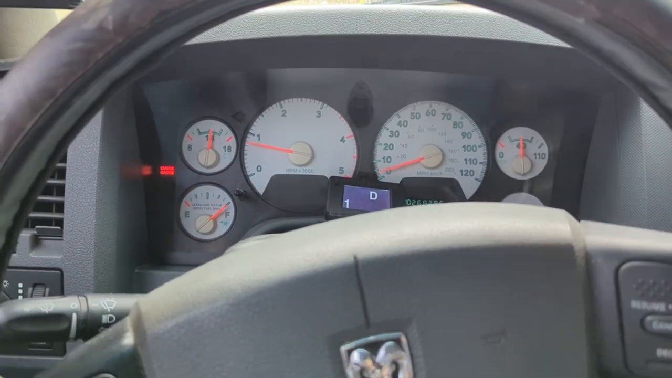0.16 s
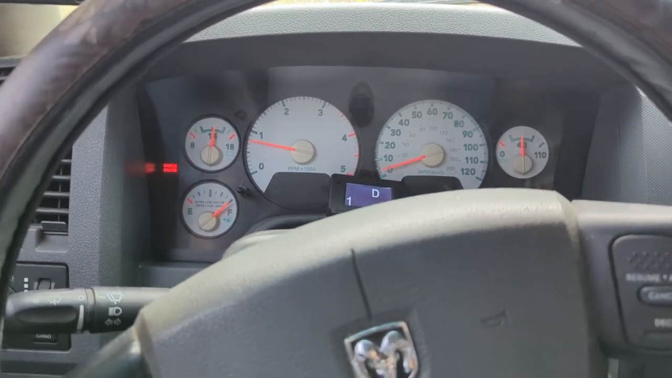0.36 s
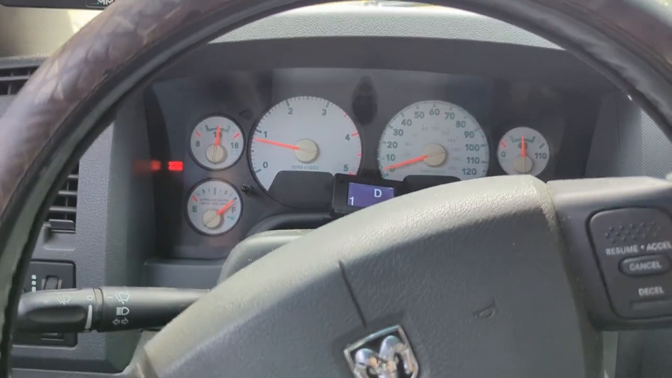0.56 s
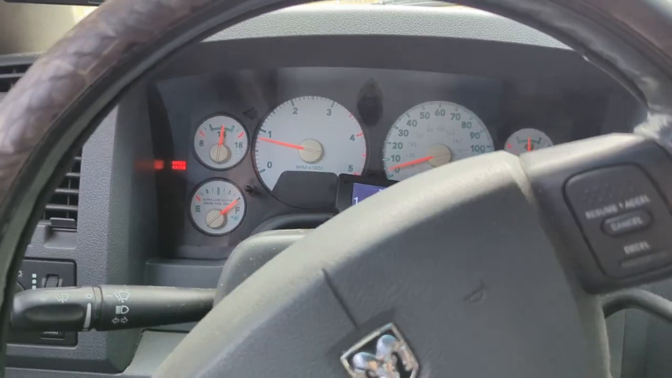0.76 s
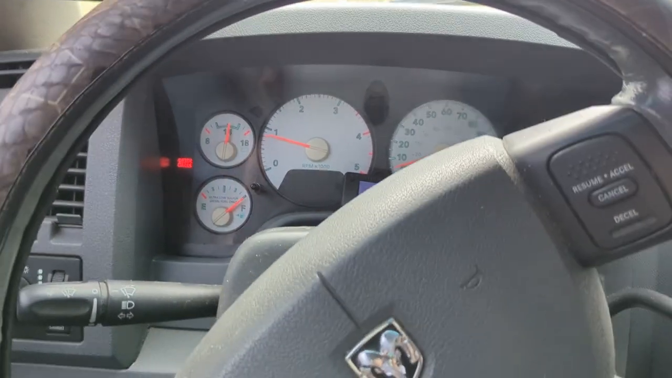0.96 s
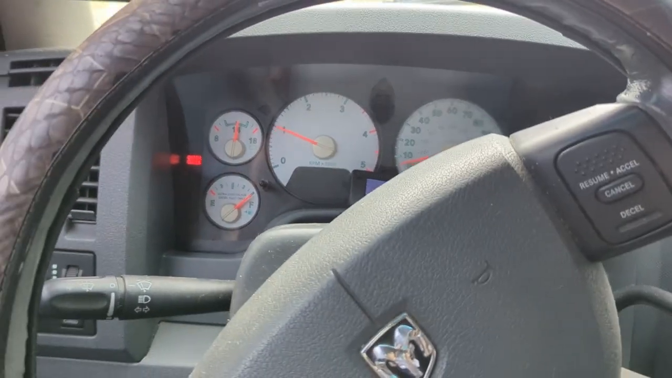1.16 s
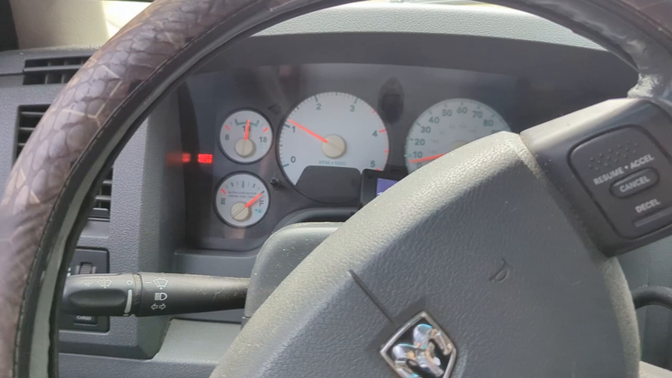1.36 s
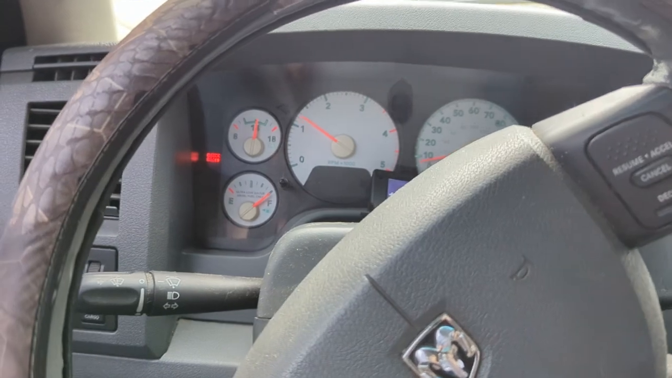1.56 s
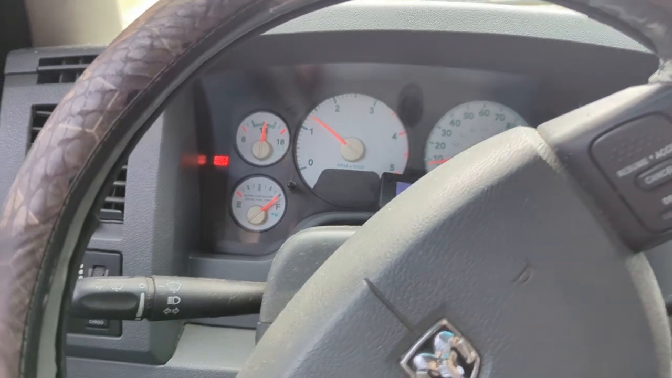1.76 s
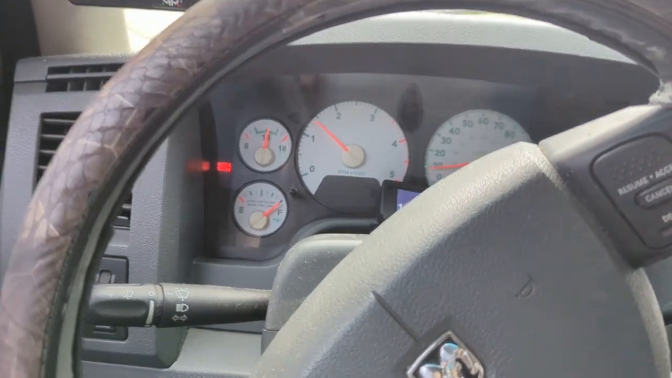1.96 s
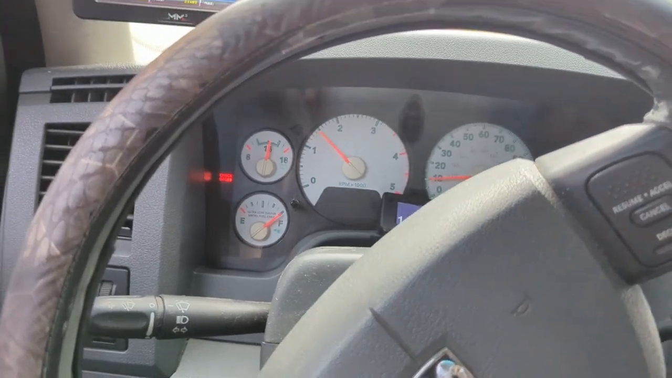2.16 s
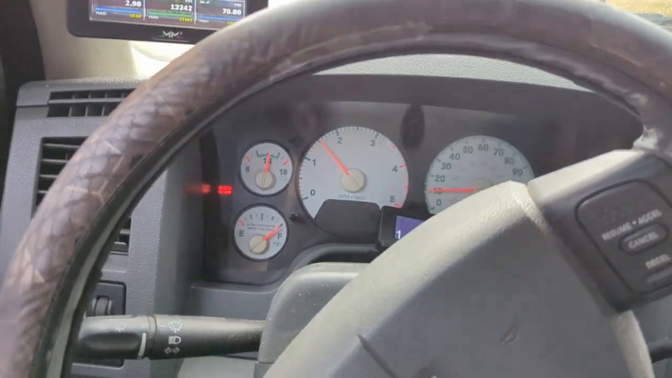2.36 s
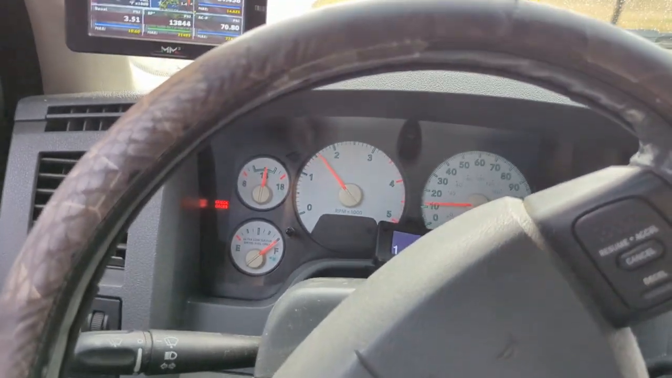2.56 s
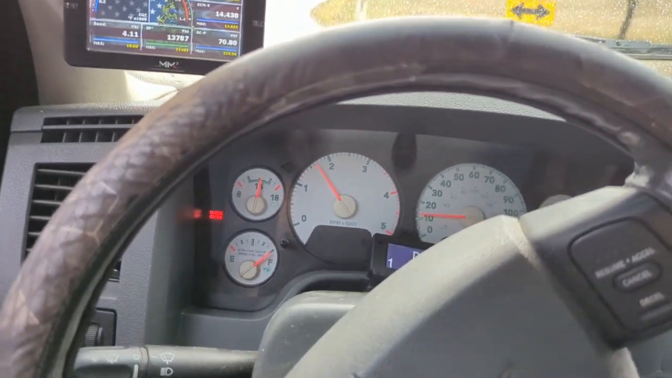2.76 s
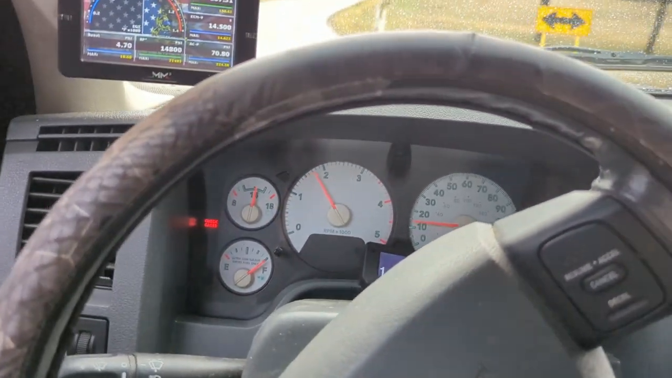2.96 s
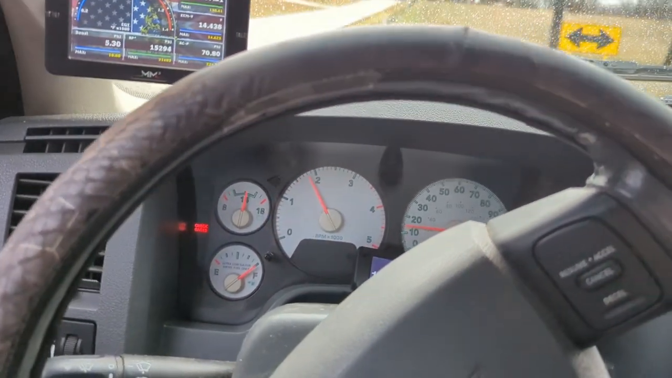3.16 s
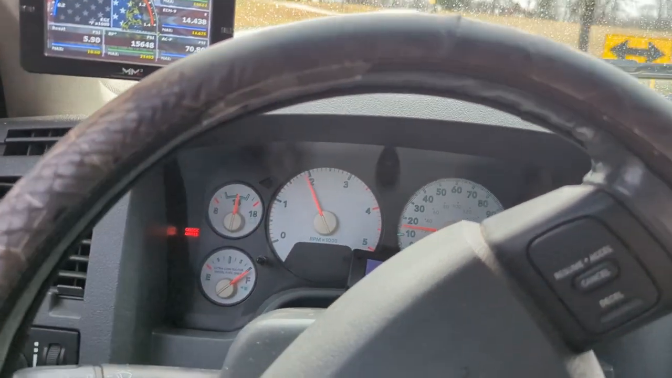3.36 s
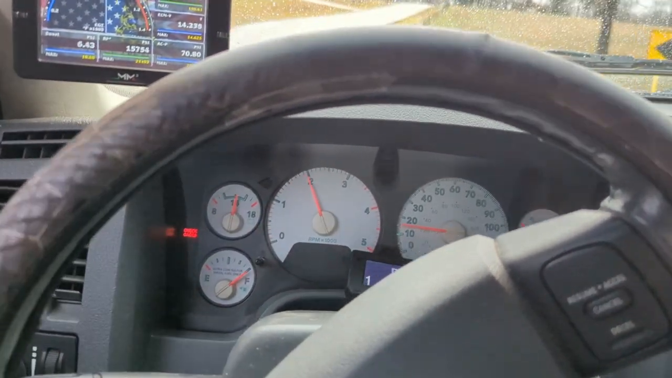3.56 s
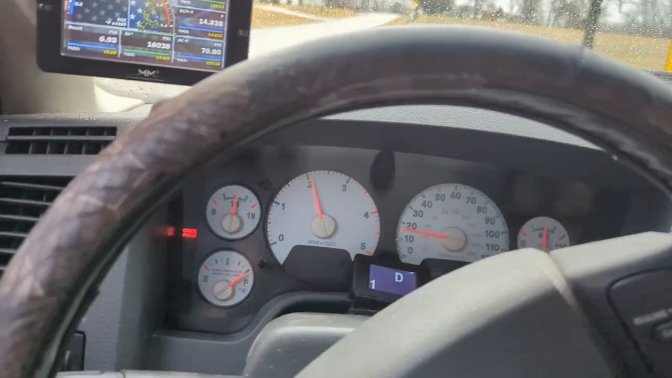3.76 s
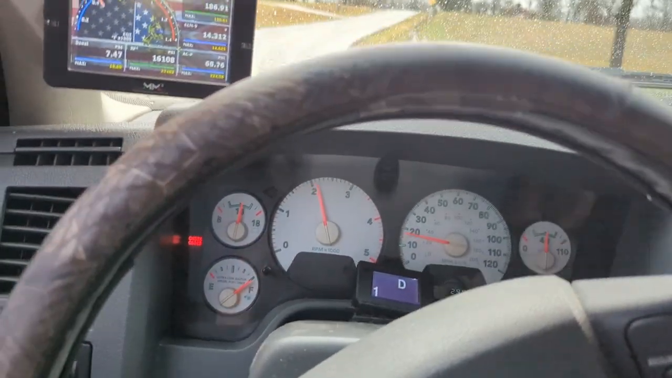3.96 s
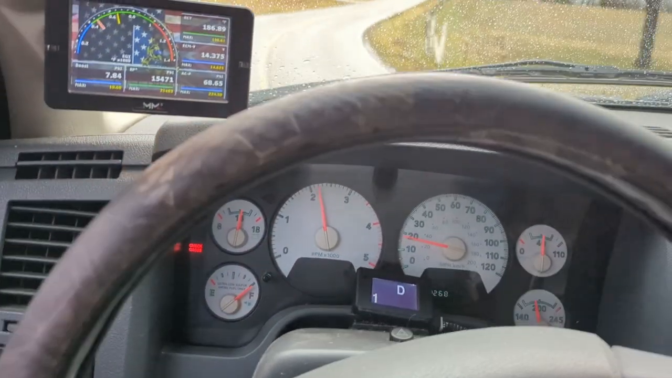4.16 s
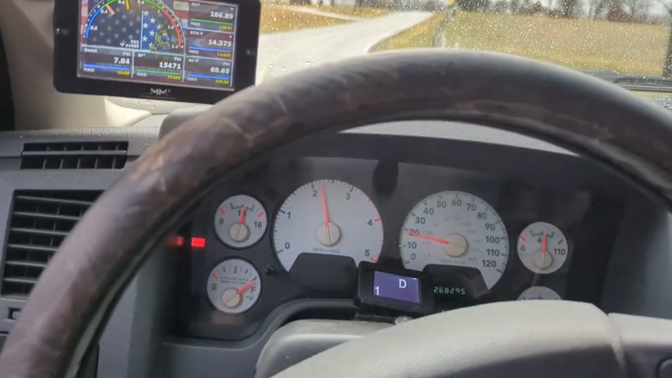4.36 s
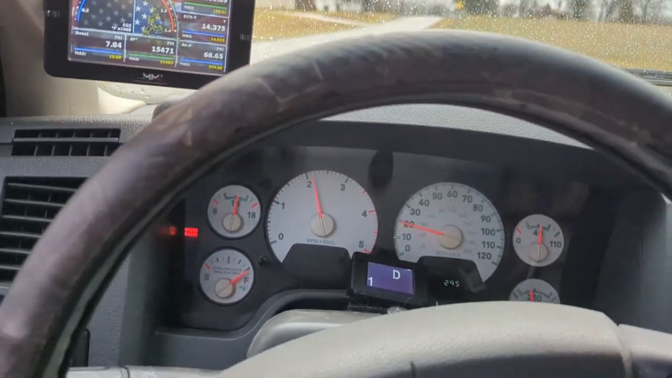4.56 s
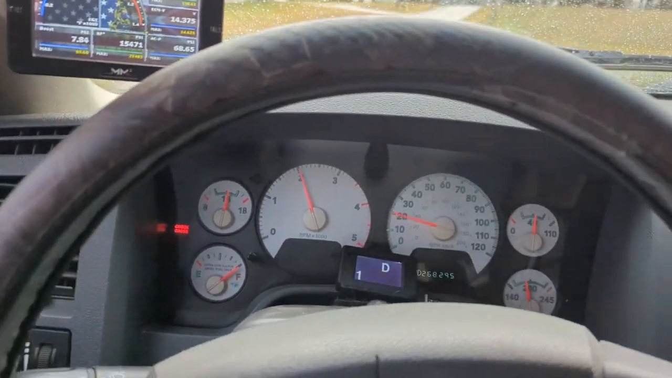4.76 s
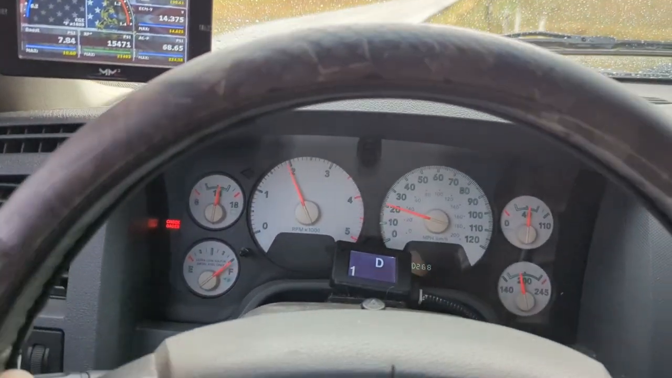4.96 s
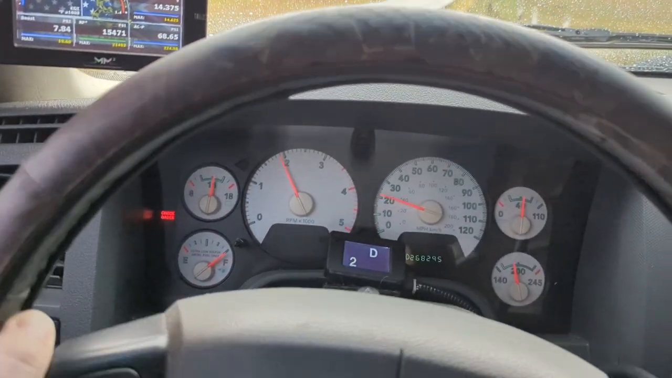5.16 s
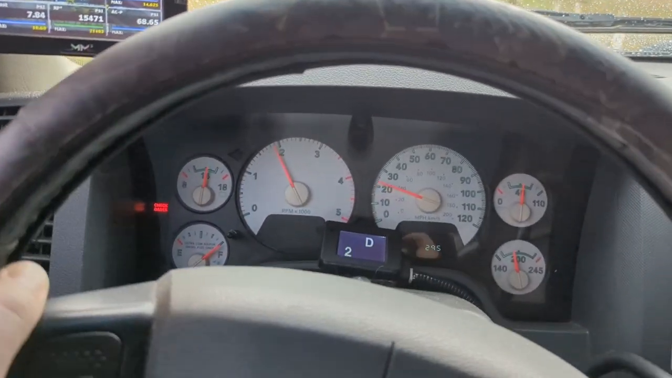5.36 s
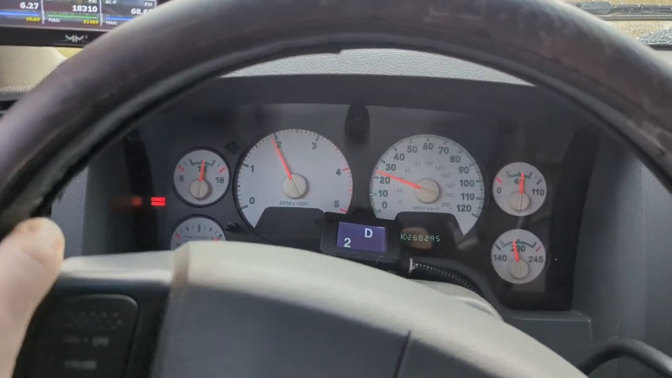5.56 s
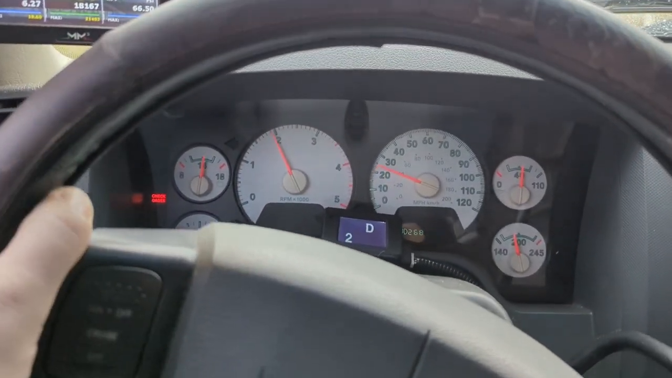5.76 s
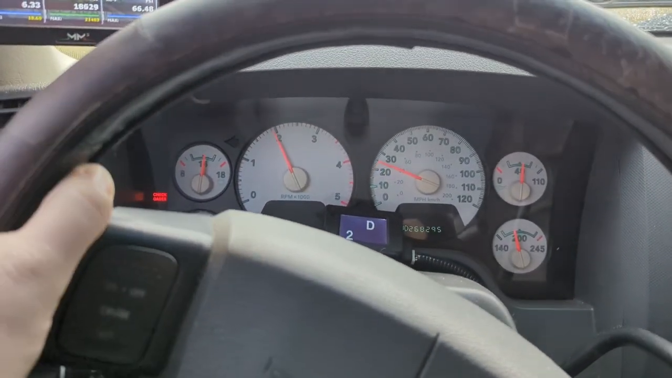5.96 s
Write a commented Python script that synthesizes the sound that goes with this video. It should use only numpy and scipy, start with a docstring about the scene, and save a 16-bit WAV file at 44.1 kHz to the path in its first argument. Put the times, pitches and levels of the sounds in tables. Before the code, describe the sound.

A handheld microphone in a pickup cab catches a six-cylinder diesel: quiet idle with faint wheel squeak and air hiss, then steady acceleration, deep resonant drone swelling unevenly as cab panels ring. Tyres rumble, bumps thump gently. Small plastic ticks and hand scuffs come near the top of the pull, followed by a smooth drop in pitch and a renewed, loaded, slowly rising drone.

```python
"""You hear a six-cylinder turbo-diesel pickup from inside the cab: it idles, pulls away and shifts up once.
The engine booms in sine tones that sweep past the cab's standing waves, over thuds and bursts of knock noise.
Filtered noise makes the road rumble and rushing air; a low tone swells and fades at each bump in the road.
A gliding tone makes the turbo whistle and the steering wheel's squeaks; short noises make a hand rubbing
the wheel and loose trim ticking."""
import sys
import numpy as np
from scipy import signal
from scipy.fft import rfft, irfft
from scipy.io import wavfile
from scipy.ndimage import uniform_filter1d

SR = 44100
rng = np.random.default_rng(int(sys.argv[2]) if len(sys.argv) > 2 else 0)


def transcribe(u):
    """Save the signal u as a 16-bit wav file named by the first command-line argument.

    u: samples, shape (n,) or (channels, n), limited to [-1, 1]; the rate is SR.
    q: integer samples, one column per channel.
    """
    v = np.clip(np.atleast_2d(u).T, -1, 1)
    q = np.round(v * 32767).astype(np.int16)
    wavfile.write(sys.argv[1], SR, q)


N = 265041
TIME = np.arange(N) / SR
FREQS = np.maximum(np.fft.rfftfreq(N, 1 / SR), 1)
CRUISE_HZ = 100  # firing rate from which engine growth is counted

# tone colour of the engine block through the bulkhead: (frequency [Hz], relative level [dB])
BLOCK_COLOUR = [(60, -27.5), (90, -2.5), (110, -0.5), (150, 2), (185, -6.5), (215, -7.5), (280, -10),
                (320, -13.5), (370, -13), (430, -16), (485, -16), (560, -22), (800, -28.5), (1200, -39.5)]


def undb(db):
    """Turn decibels into gain."""
    return 10 ** (np.asarray(db) / 20)


def unit(x):
    """Scale to an average strength (rms) of 1."""
    return x / np.sqrt(np.mean(x ** 2))


def curves(table):
    """Join each column of a table of (time, ..) rows by straight lines."""
    s, *columns = np.transpose(table)
    return [np.interp(TIME, s, column) for column in columns]


def spectrum(table):
    """Join each column of a table of (frequency, ..) rows on a log-frequency axis."""
    hz, *columns = np.transpose(table)
    return np.array([np.interp(np.log(FREQS), np.log(hz), column) for column in columns])


def shape(x, gain):
    """Filter by a gain for each frequency, then scale to rms 1."""
    return unit(irfft(rfft(x) * gain, N))


def noise():
    """Unrelated white noise left and right."""
    return rng.standard_normal((2, N))


def walk(rate):
    """Smooth random wandering that changes about rate times a second, with rms 1."""
    step = max(int(SR / rate), 1)
    held = rng.standard_normal(N)[np.arange(N) // step]
    return unit(uniform_filter1d(held, step))


def pan(db):
    """Left and right gains that make the left louder than the right by db."""
    return undb(np.array([[db], [-db]]) / 2)


def swell(s, length):
    """A smooth rise and fall around time s."""
    return np.exp(-2 * ((TIME - s) / length) ** 2)


def peak(hz, width):
    """A resonance's gain at each frequency, falling to half at the edges of its width."""
    return 1 / (1 + (2 * (FREQS - hz) / width) ** 2)


def lift(resonances):
    """Boost in dB that a table of resonances gives to each frequency."""
    return sum(db * peak(centre, width) for centre, width, db in resonances)


def ring(x, resonances):
    """Pass sound through resonances that take time to build up and die away (minimum phase)."""
    cepstrum = irfft(np.log(undb(lift(resonances))), N)
    cepstrum[1:] *= 2
    response = irfft(np.exp(rfft(cepstrum[:N // 2], N)), N)[:SR]
    return signal.fftconvolve(x, response[None], axes=1)[:, :N]


def colour(table):
    """Gain of a source's tone colour, lifted by the cab and falling away above the table's last point."""
    # panels and air in the cab that resonate: (frequency [Hz], width [Hz], boost [dB])
    cab_panels = [(197, 36, 6.5), (251, 50, -0.5), (280.2, 3.1, 6), (366.3, 9.3, 6.5), (429, 20, 6.5),
                  (484.5, 18.2, 9.5), (831, 18, 6.5), (1080, 74, 1), (1680, 40, 4.5), (1730, 51, 1.5),
                  (1880, 28, 5.5), (2240, 400, 1.5), (4850, 53, -1.5)]
    fall = np.minimum(table[-1][0] / FREQS, 1) ** 6
    return undb(spectrum(table) + lift(cab_panels)) * fall


def reflections(wet=.42, decay_s=.012, above_hz=450):
    """Windscreen and dashboard add a dense, very short echo that combs the treble on each side."""
    t = TIME[:SR // 10]
    tail = rng.standard_normal((2, len(t))) * np.exp(-t / decay_s)
    tail /= np.sqrt(np.sum(tail ** 2, axis=1, keepdims=True))
    return 1 + wet * rfft(tail, N) / (1 + (above_hz / FREQS) ** 2)


def in_cab(pair, table):
    """Colour two unrelated signals and make left and right alike by a set amount at each pitch."""
    # how alike the two sides are: (frequency [Hz], likeness [-1 to 1])
    side_likeness = [(60, 0.86), (125, 1), (250, 0.43), (500, 0.87), (1000, -.1), (2000, 0), (4000, 0)]
    alike = np.clip(spectrum(side_likeness)[0], -1, 1)
    mid, side = rfft(pair) * np.sqrt([1 + alike, 1 - alike])
    sides = np.array([mid + side, mid - side])
    return unit(irfft(sides * colour(table) * reflections(), N))


def whistle(hz, waver, waver_rate, side_db):
    """A gliding tone smeared by fast wavering of its pitch."""
    turns = np.cumsum(hz * (1 + waver * walk(waver_rate))) / SR
    return np.sqrt(2) * np.sin(2 * np.pi * turns) * pan(side_db)


def friction(hz, octaves, grain_db=1.5):
    """Grainy friction noise in one broad band."""
    band = np.exp(-.5 * (np.log2(FREQS / hz) / octaves) ** 2)
    return shape(noise() * undb(grain_db * walk(350)), band)


def whine():
    """Narrow steady bands of noise, probably the cab blower, heard mostly at idle."""
    # the bands: (frequency [Hz], width [Hz], level [dB])
    whine_bands = [(826, 12, -62.5), (1744, 45, -68), (1890, 120, -68.5), (2260, 160, -65.5)]
    return sum(shape(noise(), peak(hz, width)) * undb(db) for hz, width, db in whine_bands)


def air(knock_drive_db):
    """Intake and vents rush as filtered noise: more air is drawn as the engine works harder."""
    # tone colour of the rush: (frequency [Hz], relative left level [dB], relative right level [dB])
    air_colour = [(2000, -4.5, -6), (3870, -2, -4), (4520, 0.5, 7.5), (5240, 1, 5.5), (5970, -5, -5.5),
                  (6240, 3, 1.5), (7400, -2, -3.5), (7400, -2.5, 1.5), (9600, 4.5, 1.5), (9600, 7.5, -2.5),
                  (13300, 2, -18), (14500, 0.5, -19), (15700, -2.5, -20)]
    gulp_db = 1.2 * swell(1.35, 0.33)  # a gulp as the pedal goes down
    db = 0.5 * knock_drive_db - 31.5 + gulp_db + .5 * walk(9.4)
    return in_cab(noise(), air_colour) * undb(db)


def road(bounce_hz=55.2):
    """Tyre rumble comes through the springs; each bump rocks the cab for a few cycles."""
    # rumble from road roughness: (time [s], level [dB])
    roughness = [(0, -30.5), (.75, -45), (1.1, -32), (2.2, -23), (3, -20), (4.2, -21), (6, -21.5)]
    # tone colour of the cab on its springs: (frequency [Hz], relative level [dB])
    spring_colour = [(15, -39.5), (25, -30), (34, -12.5), (45, 6), (55, 4), (66, 7.5), (85, -1), (120, 0),
                     (190, -5.5), (300, -28), (700, -51)]
    # bumps in the road: (middle [s], length [s], level [dB])
    road_bumps = [(1.64, 0.049, -19.5), (2.412, .035, -16), (2.613, 0.062, -23.5), (2.84, 0.079, -15.5),
                  (3.296, 0.076, -20), (3.562, 0.055, -18), (4.188, 0.082, -19.5), (4.789, 0.06, -13),
                  (5.309, 0.18, -16), (5.901, 0.1, -18)]
    out = in_cab(noise(), spring_colour) * undb(curves(roughness)[0])
    for s, length, db in road_bumps:
        rocking = np.sin(2 * np.pi * (bounce_hz * TIME + rng.random()))
        out = out + np.sqrt(2) * undb(db) * swell(s, length) * rocking
    return out


def ticks(decay_s=0.012):
    """Loose plastic trim ticks: each tick starts at once, rings at the trim's pitches and dies away."""
    # the ticks: (time [s], level before panning [dB])
    trim_ticks = [(3.875, -50), (3.937, -49), (3.972, -46), (3.986, -56), (4.053, -48.5), (4.155, -40),
                  (4.36, -48), (4.85, -50)]
    # what the trim rings with: (frequency [Hz], width [Hz], relative level [dB])
    trim_tones = [(2300, 1500, -6.5), (5000, 410, -0.5), (4900, 380, -4), (5570, 130, 4), (8100, 1200, -5),
                  (12300, 4000, -14)]
    blows = 0
    for s, db in trim_ticks:
        blows = blows + undb(db) * (TIME >= s) * np.exp(-np.abs(TIME - s) / decay_s)
    response = sum(undb(db) * peak(hz, width) for hz, width, db in trim_tones)
    return shape(noise(), response) * blows * pan(-2.5)


def rubs():
    """Rasp and hiss swell and fade as the wheel slips through the hand; later it swishes back to centre."""
    # rubs and scuffs: (middle [s], length [s], rasp level [dB], hiss level before panning [dB])
    hand_slips = [(.18, .14, -55, -58), (.166, .018, -62, -52), (.262, .007, -56, -43),
                  (.35, .04, -59, -61), (3.665, .012, -37.5, -46), (4.2, .14, -46, -55),
                  (4.205, .007, -42, -48), (4.268, .011, -39.5, -52), (4.323, .014, -39, -57),
                  (4.76, .14, -51, -70)]
    rasp = friction(1900, octaves=.8)
    hiss = friction(11500, octaves=.7, grain_db=3.5) * pan(12)
    out = friction(7150, octaves=.23) * swell(5.503, 0.43) * undb(-64) * pan(-9.5)  # soft swish, on the right
    for s, length, rasp_db, hiss_db in hand_slips:
        out = out + swell(s, length) * (rasp * undb(rasp_db) + hiss * undb(hiss_db))
    return out


def squeaks(flicker_db=3.5):
    """The turning steering wheel squeaks unevenly: quick start, fade, and a pitch that arches and sags."""
    # the squeaks: (start [s], length [s], level before panning [dB])
    wheel_squeaks = [(.065, .33, -63.5), (1.2, .22, -68)]
    top_hz, top_s, sag_hz_per_s, arch_s, attack_s = 3540, .08, 1800, .04, .025
    out = 0
    for s, length, db in wheel_squeaks:
        age = np.clip(TIME - s, 0, length)
        hz = top_hz - sag_hz_per_s * (np.hypot(age - top_s, arch_s) - arch_s)
        envelope = np.minimum(age / attack_s, 1) * (1 - (age / length) ** 2)
        loudness = envelope * undb(db + flicker_db * walk(60))
        out = out + whistle(hz, waver=0.0041, waver_rate=1800, side_db=-6) * loudness
    return out


def turbo(flicker_db=2.5):
    """The blade tone climbs steadily as the turbo spools up, heard only around its loudest moment."""
    loudest_s, length_s, level_db = 2.48, .39, -70.5  # level before panning
    loudest_hz, rise_hz_per_s = 13880, 4800
    hz = np.clip(loudest_hz + rise_hz_per_s * (TIME - loudest_s), 0, SR / 2)
    loudness = swell(loudest_s, length_s) * undb(level_db + flicker_db * walk(45))
    return whistle(hz, waver=.012, waver_rate=900, side_db=16.5) * loudness


def knock(firings, knock_drive_db, depth=0.59, decay=0.64, scatter_db=4.0, flicker_db=.5):
    """Each firing gives a burst of combustion noise of random strength, dying away until the next."""
    # tone colour of the knock: (frequency [Hz], relative left level [dB], relative right level [dB])
    knock_colour = [(200, -11.5, -6), (450, -0.5, 7), (570, -8, 6), (796, 5, 1.5), (960, -1.5, 2),
                    (1220, -2, 2.5), (1700, -4.5, -1), (2220, -9.5, -2), (2870, -10, -4),
                    (3560, -14, -13.5), (4330, -21, -27), (5000, -30.5, -16), (6300, -28.5, -32.5),
                    (10000, -58.5, -60.5)]
    sizes = undb(scatter_db * rng.uniform(-2.2, 1.9, N))[firings.astype(int)]
    gate = 1 + depth * sizes * np.exp(-(firings % 1) / decay)  # decay counts in firing intervals
    bursts = in_cab(noise() * gate * undb(flicker_db * walk(20)), knock_colour)
    return bursts * undb(knock_drive_db + 4.5)


def growl(firing_hz, firings, thud_drive_db, flutter_db=1.8, boost_db=8):
    """Higher multiples of the firing rate swell and fade as each crosses a panel resonance."""
    # the tones: (multiple of the firing rate [x], relative level [dB])
    growl_orders = [(3, -3.5), (3.5, -10.5), (4, -5), (4.5, -16.5), (5, -11.5), (6, -14)]
    response = colour(BLOCK_COLOUR)[0]
    out = 0
    for multiple, db in growl_orders:
        flutter = undb(boost_db + db + flutter_db * walk(18))
        gain = np.interp(multiple * firing_hz, FREQS, response) * flutter
        out = out + gain * np.sin(2 * np.pi * (multiple * firings + rng.random()))
    return out * undb(thud_drive_db)


def thuds(firings, thud_drive_db, scatter_db=2.5, ring_s=0.04, loose=0.84, count=6):
    """Each cylinder shakes the cab along its own path, so the pattern repeats every two crank turns."""
    starts = np.flatnonzero(np.diff(np.floor(firings)))
    sizes = undb(scatter_db * rng.standard_normal(len(starts)))
    t = TIME[:SR // 5]
    out = 0
    for cylinder in range(count):
        pulses = np.zeros((1, N))
        pulses[0, starts[cylinder::count]] = sizes[cylinder::count]
        path = rng.standard_normal((2, len(t))) * np.exp(-t / ring_s)
        out = out + signal.fftconvolve(pulses, path, axes=1)[:, :N]
    # even out the strength that denser firings would add; growth is set below
    even = unit(out / np.sqrt(np.gradient(firings)))
    block = in_cab(even + loose * noise(), BLOCK_COLOUR)
    # the deep part is there at idle already; the harder part grows more with speed
    deep = irfft(rfft(block) / (1 + (FREQS / 205) ** 12), N)
    hard = block - deep
    return deep * undb(0.46 * thud_drive_db - 9.5) + hard * undb(thud_drive_db + 6.5)


def boom(octaves, firings, load_db, flutter_db=1.0, side_db=0.74, lag_turns=0.012):
    """The firing tone, its octave and two half orders set the cab's standing waves ringing as they sweep."""
    # the tones before the standing waves: (multiple of the firing rate [x], level at cruise [dB],
    # growth [dB per octave of speed], growth [dB per dB of load])
    boom_orders = [(1, -36, 10, 1.8), (1.5, -39.5, 14, -0.1), (2, -35.5, 8, 0.12), (2.5, -45, 8.5, 2.94)]
    # the cab's standing waves, and one null: (frequency [Hz], width [Hz], boost [dB])
    cab_waves = [(58, 25, 32), (74.3, 2.9, -11.5), (91.3, 19, 1.5), (105.35, 9.5, 19), (122.56, 28.2, 16),
                 (140.5, 13.4, 9.5), (149.7, 3.6, 14.5), (169.75, 31.5, 14), (191.95, 25, 1.5),
                 (246, 15, 3)]
    out = 0
    for k, (multiple, cruise_db, growth_db, load_gain) in enumerate(boom_orders):
        db = cruise_db + growth_db * octaves + load_gain * load_db
        # later tones in the table are shifted further between the two sides
        turns = multiple * firings + rng.random() + k * lag_turns * np.array([[0], [1]])
        out = out + np.sqrt(2) * undb(db + flutter_db * walk(25)) * np.sin(2 * np.pi * turns)
    return ring(out, cab_waves) * pan(side_db)


def scene():
    """Engine speed and load drive the engine and air layers; road, turbo and cab noises join them."""
    # idle, pull-away in first gear, upshift, second gear: (time [s], firing rate [Hz])
    engine_speed = [(0, 39.66), (.73, 40.22), (1.03, 57.56), (1.15, 60.4), (1.6, 67.9), (2.4, 81.24),
                    (2.8, 87.57), (3, 93.7), (3.35, 99.23), (3.62, 104.9), (3.8, 108), (4.03, 112.5),
                    (4.2, 110.7), (4.58, 97.84), (4.75, 95.13), (5, 92.4), (5.45, 95.78), (6, 98.1)]
    # load, easing for the shift and pulling harder in second: (time [s], load [dB, weighted by each layer])
    engine_load = [(0, 2.5), (.8, 1.67), (1.1, 0.26), (2.1, 1), (3.3, -0.5), (4.3, 2.5), (4.6, -.5),
                   (4.85, 5), (6, 3)]
    firing_hz, load_db = curves(engine_speed)[0], curves(engine_load)[0]
    firings = np.cumsum(firing_hz) / SR  # running count of firings
    octaves = np.log2(firing_hz / CRUISE_HZ)
    # drives: how hard the layers are pushed, in dB; each layer adds its own offset
    thud_drive_db = -31 + 9.5 * np.minimum(octaves, np.log2(87 / CRUISE_HZ))  # no growth above 87 Hz
    knock_drive_db = -47 + 7.5 * octaves + 0.54 * load_db
    background = whine() + air(knock_drive_db) + road()
    cab = ticks() + rubs() + squeaks()
    engine = turbo() + knock(firings, knock_drive_db) + growl(firing_hz, firings, thud_drive_db)
    engine = engine + thuds(firings, thud_drive_db) + boom(octaves, firings, load_db)
    return background + cab + engine


def record(dry, notch_hz=9800, notch_q=5, top_hz=15700):
    """The microphone port notches the treble; peaks are held softly near full scale and the top is cut."""
    ported = signal.lfilter(*signal.iirnotch(notch_hz, notch_q, fs=SR), dry)
    eased = ported * np.minimum(np.minimum(TIME, TIME[::-1]) / .005, 1)  # 5 ms fades at both ends
    held = eased / (1 + (eased / 1.02) ** 12) ** (1 / 12)
    return signal.sosfilt(signal.ellip(10, .1, 80, top_hz, fs=SR, output="sos"), held)


dry = scene()
out = record(dry)
transcribe(out)
```